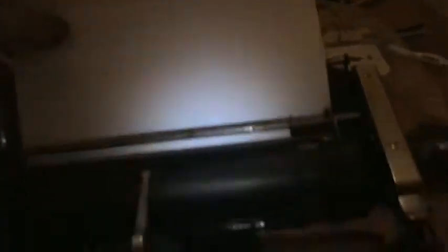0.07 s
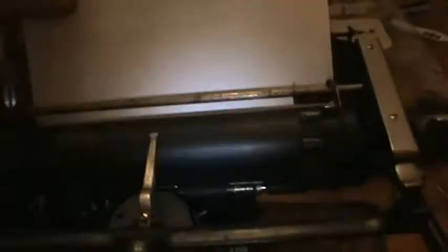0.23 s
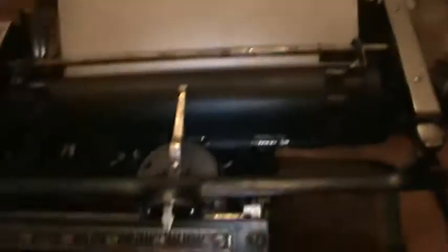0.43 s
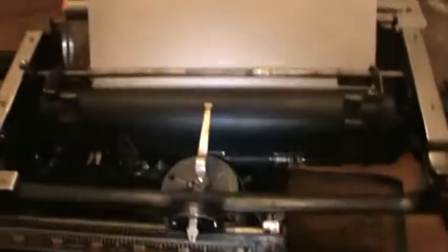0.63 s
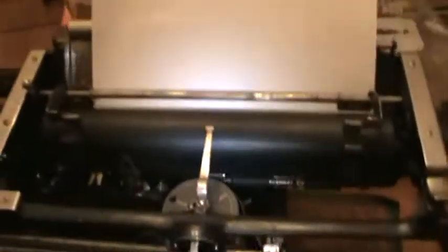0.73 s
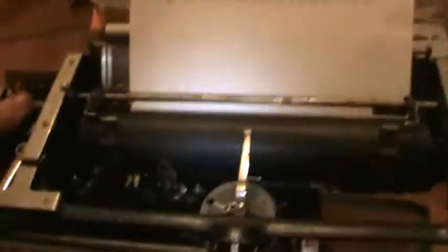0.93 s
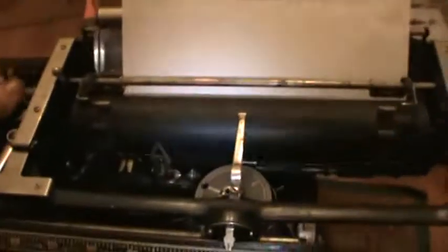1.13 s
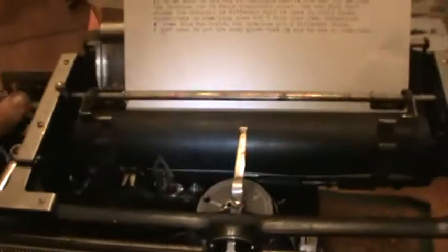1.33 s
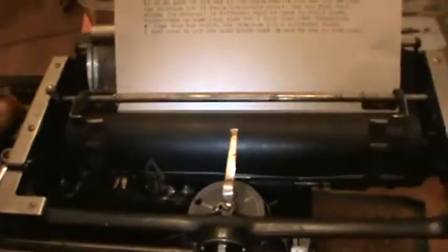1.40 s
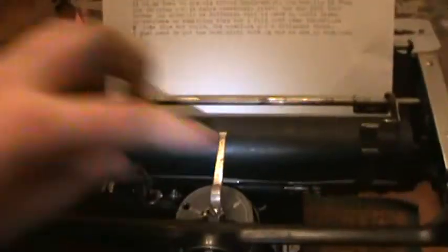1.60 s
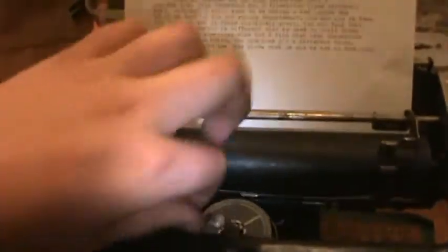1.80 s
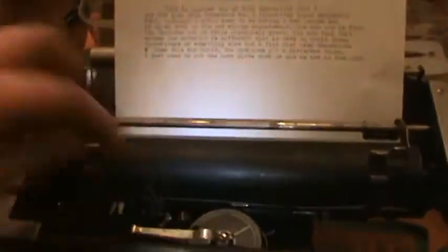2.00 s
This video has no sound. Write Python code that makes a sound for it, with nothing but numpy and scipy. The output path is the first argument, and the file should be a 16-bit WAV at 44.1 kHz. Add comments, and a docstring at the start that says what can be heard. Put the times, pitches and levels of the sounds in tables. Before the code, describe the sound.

A manual typewriter's roller is turned twice in ratcheting bursts, then a lever clicks once.

```python
"""A manual typewriter's roller is turned twice: a spring catch scrapes over a toothed wheel, snaps
into each notch and shakes the carriage and the desk. Before that, knocks and rustle of handling die
away. Afterwards a hand taps and brushes the machine, and a steel lever clicks once. It is all heard
in a small room through a hand-held camera, which adds a faint buzz and whine."""
import sys
import numpy as np
from scipy import signal
from scipy.fft import rfft, irfft, next_fast_len
from scipy.io import wavfile
from scipy.ndimage import map_coordinates

SR = 44100
rng = np.random.default_rng(int(sys.argv[2]) if len(sys.argv) > 2 else 0)


def dump_mix(stems):
    """Bounce the given channels to the path in sys.argv[1] as a 16-bit WAV at rate SR."""
    frames = np.atleast_2d(stems).T  # one column per channel
    limited = np.clip(frames, -1, 1)  # hard clip at full scale
    pcm = np.round(limited * 32767).astype(np.int16)
    wavfile.write(sys.argv[1], SR, pcm)


N = 90449


def amp(db):
    """Turn decibels into a gain."""
    return 10 ** (np.asarray(db) / 20)


def along(points, hz):
    """Read a curve of (pitch_hz, value) points at hz, on a log pitch scale."""
    pitches, values = np.transpose(points)
    return np.interp(np.log(hz + 1), np.log(pitches + 1), values)


def gains(rows):
    """One gain curve for each level column, silent outside the rows' times."""
    times, *levels = np.transpose(rows)
    return [amp(np.interp(since(0), times, db, left=-120, right=-120)) for db in levels]


def since(start):
    """Seconds since start, zero before it."""
    return np.maximum(np.arange(N) / SR - start, 0)


def blow(start, rise, fade):
    """Loudness of a hit: a straight rise, then a fall of 60 dB every fade seconds."""
    return np.minimum(since(start) / rise, 1) * 1000 ** (-since(start + rise) / fade)


def filtered(x, response):
    """Scale each frequency in x by response(hz)."""
    size = next_fast_len(N + SR // 2)
    return irfft(rfft(x, size) * response(np.fft.rfftfreq(size, 1 / SR)), size)[..., :N]


def resonance(f, hz, width):
    """A filter curve that passes only pitches near hz."""
    return 1j * f * width / (hz * hz - f * f + 1j * f * width)


def resonate(x, peaks):
    """A sound plus the ringing it stirs up at each peak."""
    return filtered(x, lambda f: 1 + sum(amp(db) * resonance(f, hz, width) for hz, width, db in peaks))


def noise(colour, side_db):
    """Stereo noise of strength 1, shaped by colour(hz); more side_db makes it wider."""
    mid, side = filtered(rng.standard_normal((2, N)), colour)
    return unit(np.array([mid + amp(side_db) * side, mid - amp(side_db) * side]))


def unit(x):
    """Scale to an average strength (rms) of 1."""
    return x / np.sqrt(np.mean(x ** 2) + 1e-20)


def grain(rate_hz, depth_db):
    """The fast, random flutter in level of rubbing surfaces."""
    wobble = map_coordinates(rng.standard_normal(N), [np.arange(N) * rate_hz / SR], order=1)
    return unit(amp(depth_db * wobble))


def ring(tones, start, rise):
    """Fading tones of a struck object, their levels a little different each time."""
    return sum(amp(db + rng.standard_normal()) * blow(start, rise, fade)
               * np.sin(2 * np.pi * hz * since(start)) for hz, db, fade in tones)


def pan(x, balance_db):
    """Make the left side louder than the right by balance_db."""
    return x * amp([[balance_db / 2], [-balance_db / 2]])


# how long the room echoes: pitch_hz, fade_s
ROOM_FADES = [(100, 0.71), (400, 0.3), (1500, 0.16), (4000, 0.19), (9000, 0.15), (15000, 0.091)]
def room(x, wet_db, side_db):
    """Add the echo from the walls; high pitches die first."""
    hz, t, spectrum = signal.stft(rng.standard_normal((2, SR // 2)), SR, nperseg=256)
    fading = 1000 ** (-t / along(ROOM_FADES, hz)[:, None])
    mid, side = signal.istft(spectrum * fading, SR, nperseg=256)[1]
    tail = np.array([mid + amp(side_db) * side, mid - amp(side_db) * side])
    tail = np.pad(tail / np.linalg.norm(tail[0]), ((0, 0), (130, 0)))  # arrives 3 ms late
    return x + amp(wet_db) * signal.fftconvolve(x.mean(0)[None], tail, axes=1)[:, :N]


# tone of the room's rumble and hiss: pitch_hz, level_db
HISS_TONE = [(25, -16.5), (60, -10.5), (110, -1), (170, -5), (350, -4.5), (575, -14), (860, -16),
             (1300, -21.5), (2500, -25), (4600, -26.5), (13000, -29.5), (16000, -29)]
# tones in the camera's buzz: pitch_hz, level_db
BUZZ_TONES = [(1905, -2.5), (2800, -12), (4800, -14)]
def background(frame_rate_hz=30, wander_hz=20.7):
    """Room rumble and hiss, a buzz pulsing at the camera's frame rate, and a thin whine."""
    t = since(0)
    pulse = (1 + np.cos(2 * np.pi * frame_rate_hz * (t - 1.4555))) / 2
    drift = np.cumsum(rng.standard_normal(N)) * np.sqrt(2 * np.pi * wander_hz / SR)
    buzz = unit(pulse * sum(amp(db) * np.sin(2 * np.pi * hz * t + drift) for hz, db in BUZZ_TONES))
    whine = noise(lambda f: resonance(f, hz=15698, width=25), side_db=-25)
    hiss = noise(lambda f: amp(along(HISS_TONE, f)), side_db=-8.5)
    return amp(-52.5) * hiss + amp(-62.5) * buzz + amp(-71) * whine


# loudness of the rustle: time_s, body_db, treble_db
RUSTLE_LEVELS = [(0, -34.5, -53), (.05, -33.5, -35), (.08, -42.5, -39), (.12, -31.5, -33.5),
                 (.17, -41, -43.5), (.195, -44, -33.5), (.225, -41, -45), (.25, -34, -58),
                 (.32, -38, -59.5), (.42, -48.5, -57.5), (.445, -45.5, -49.5), (.52, -53.5, -56),
                 (.62, -70, -63.5)]
# tone of its low body and of its treble: pitch_hz, level_db
BODY_TONE = [(60, -18), (200, -0.5), (600, 0.5), (900, -8), (1400, -7.5), (2500, -22.5), (6000, -39)]
TREBLE_TONE = [(500, 5), (2000, -1), (3400, 2), (4800, -0.5), (7000, -9.5), (12000, -14), (15500, -68)]
def rustle():
    """Handling rubs surfaces together, making a low and a high grainy noise."""
    body, treble = gains(RUSTLE_LEVELS)
    body *= grain(rate_hz=150, depth_db=3.5)
    treble *= grain(rate_hz=570, depth_db=3.5)
    return (body * noise(lambda f: amp(along(BODY_TONE, f)), side_db=-16.5)
            + treble * noise(lambda f: amp(along(TREBLE_TONE, f)), side_db=-22))


# knocks and touches: start_s, level_db, rise_s, fade_s, low_hz, high_hz, ring_hz
HAND_KNOCKS = [(.002, -24, 0.00033, 0.032, 200, 2550, 1350), (0.0176, -13, 0.00026, 0.019, 300, 4180, 1400),
               (0.0177, -17, 0.00078, 0.015, 200, 2370, 630),
               (0.036, -11, 0.00049, 0.013, 2320, 6260, 3250), (0.0898, -33, .0005, 0.017, 200, 6000, 505),
               (.0952, -24.5, 0.00047, 0.024, 130, 3660, 266), (0.1851, -22, .0004, 0.014, 603, 1780, 1440),
               (0.1857, -22, 0.00045, 0.011, 3000, 4900, 4530),
               (0.215, -29, 0.00067, 0.032, 600, 5040, 3300), (0.232, -24, 0.0026, 0.096, 395, 3030, 1770),
               (.278, -33.5, 0.0049, 0.082, 400, 3780, 1260), (0.312, -40, .006, 0.044, 494, 2190, 1510),
               (0.2814, -37, 0.00019, 0.021, 4000, 11000, 4700),
               (0.3384, -34, 0.00032, 0.01, 4200, 7600, 4800),
               (0.3615, -44, 0.00054, 0.023, 3800, 7000, 4370),
               (.369, -41.5, 0.00071, .03, 3800, 6700, 4400),
               (0.4326, -26.5, 0.00016, 0.015, 1490, 9900, 5050),
               (0.5012, -36.5, 0.00072, 0.022, 1210, 11300, 5900),
               (1.658, -41.5, 0.00047, 0.021, 1000, 3000, 3200),
               (1.71, -49, 0.0011, 0.025, 1500, 10000, 3030), (1.937, -46, .003, 0.077, 3000, 6760, 4270)]
def knocks(top_hz=13600):
    """Each knock is a burst of noise between a low and a high pitch, with one ringing peak."""
    out = np.zeros((2, N))
    for start, db, rise, fade, low_hz, high_hz, ring_hz in HAND_KNOCKS:
        def colour(f):
            bass_cut = (f / low_hz) ** 2 / np.sqrt(1 + (f / low_hz) ** 4)
            treble_cut = 1 / np.sqrt((1 + (f / high_hz) ** 6) * (1 + (f / top_hz) ** 30))
            return bass_cut * treble_cut * (1 + amp(9) * resonance(f, ring_hz, 0.12 * ring_hz))
        out += amp(db) * blow(start, rise, fade) * noise(colour, side_db=-16)
    return out


# thuds and taps: start_s, level_db, pitch_hz, fade_s
HAND_THUDS = [(0.0129, -27, 173, 0.099), (.0185, -10.5, 570, 0.012), (0.0947, -22.5, 272, 0.02),
              (0.434, -46, 60, 0.25), (0.437, -51, 208, 0.15), (1.6188, -41.5, 790, 0.022),
              (1.6582, -36.5, 1290, 0.023)]
def thuds():
    """Whatever is knocked or tapped rings briefly at one pitch."""
    return sum(ring([(hz, db, fade)], start, rise=0.0011) for start, db, hz, fade in HAND_THUDS)


def desk_bump(start=0.512, pitch_hz=103.5):
    """A soft bump makes the desk give one low note."""
    return amp(-39.5) * blow(start, rise=0.018, fade=0.23) * np.sin(2 * np.pi * pitch_hz * since(start))


# snaps of the catch: start_s, level_db, rise_s, fade_s, thump_offset_db, tilt_db_per_octave
CATCH_SNAPS = [(0.7828, -15, .001, 0.032, 1.5, -1), (.8000, -18, 0.0011, 0.025, 9.5, -0.5),
               (0.8146, -12, 0.0009, 0.021, -7, 1), (0.8343, -17, 0.00079, 0.026, -2, 0),
               (0.8542, -18, 0.0024, 0.021, 2, 0), (0.8932, -16, 0.0022, 0.017, 4, -2.5),
               (0.98, -38, .001, 0.023, 11, -2), (.9995, -31.5, 0.0007, 0.047, 8.5, -7),
               (1.0934, -35, 0.0021, 0.063, -8, -6), (1.1403, -13.5, .0006, 0.042, -4.5, 7),
               (1.1464, -17.5, 0.0012, 0.021, -16, -2.5), (1.1508, -18, 0.0019, 0.033, -26, 1),
               (1.1677, -16.5, 0.0014, 0.021, 3, 1), (1.2022, -17.5, 0.00095, 0.032, -3, 0),
               (1.2080, -18, 0.00078, 0.0066, -3, 16), (1.229, -15.5, 0.0033, 0.04, 3, 3),
               (1.2510, -23, 0.0015, 0.0089, -2, -9.5), (1.2771, -16, 0.002, 0.013, 4.5, 1)]
# loudness of the scrape, one list for each turn: time_s, level_db
TURN_LEVELS = [
    [(.745, -60), (.764, -45.5), (.778, -29.5), (.79, -29), (.84, -28.5), (.88, -37), (.9, -27),
     (.925, -69), (.975, -59), (.997, -36.5), (1.02, -71)],
    [(1.118, -45.5), (1.14, -26), (1.16, -24.5), (1.185, -34), (1.225, -30.5), (1.27, -35.5), (1.3, -40.5),
     (1.36, -75)],
]
# tone of a snap and of the scrape: pitch_hz, level_db
SNAP_TONE = [(120, -37), (300, -6), (480, -2.5), (720, 1), (1000, -11.5), (1450, 2.5), (2500, -4.5),
             (3300, -3.5), (5700, -1), (6700, -7.5), (8200, -4.5), (11500, -5), (15500, -23)]
SCRAPE_TONE = [(120, -14), (330, 2.5), (700, -16), (1000, -7), (1500, -2), (4700, -2.5), (7000, -6.5),
               (11500, -7), (13500, -12), (15500, -21)]
# where the carriage rings: pitch_hz, width_hz, level_db
CARRIAGE_PEAKS = [(1413, 60, -5), (1940, 96, -1.5), (2370, 25, 3), (2900, 92, -2.5), (3150, 240, 4),
                  (4310, 130, 4.5), (4720, 110, 3), (5800, 160, 3)]
# low notes of the frame and desk: pitch_hz, level_db, fade_s
FRAME_TONES = [(100.3, -22.5, 0.32), (293.8, -16, 0.13), (328, -31, .14), (401.6, -24, 0.19)]
def roller():
    """The catch scrapes up each tooth and snaps down; the carriage rings and the frame thumps."""
    contact, thump, hits = np.zeros((2, N)), np.zeros(N), []
    for start, db, rise, fade, thump_db, tilt in CATCH_SNAPS:
        colour = lambda f: amp(along(SNAP_TONE, f) + tilt * np.log2((f + 100) / 4000))
        contact += amp(db) * blow(start, rise, fade) * noise(colour, side_db=-16.5)
        thump += amp(db + thump_db) * ring(FRAME_TONES, start, rise=0.0041)
        hits.append((start, db + thump_db / 2))
    pressure = sum(gains(turn)[0] for turn in TURN_LEVELS) * grain(rate_hz=460, depth_db=0.5)
    contact += amp(-1.5) * pressure * noise(lambda f: amp(along(SCRAPE_TONE, f)), side_db=-15)
    contact *= grain(rate_hz=3200, depth_db=0.5)
    carriage = amp(-1.5) * resonate(contact, CARRIAGE_PEAKS)
    return room(carriage, wet_db=-14, side_db=-7) + thump + amp(-18.5) * clatter(hits)


# tone of the shaken machine: pitch_hz, level_db
CLATTER_TONE = [(120, -3), (200, -23), (300, 8), (410, 6.5), (480, -2), (640, 0), (830, -1), (1050, -13),
                (1450, -5), (2700, -9), (6000, -25), (15000, -27)]
def clatter(hits):
    """Many plates and rods ring together in a blur after each hit (start_s, level_db)."""
    power = sum((amp(db) * blow(start, rise=0.0058, fade=0.25)) ** 2 for start, db in hits)
    return np.sqrt(power) * noise(lambda f: amp(along(CLATTER_TONE, f)), side_db=-8.5)


# loudness of the hand's rub: time_s, level_db
RUB_LEVELS = [(1.72, -73), (1.737, -44.5), (1.743, -35), (1.747, -39.5), (1.753, -56), (1.77, -56)]
# tone of the rub: pitch_hz, level_db
RUB_TONE = [(300, -18), (800, -0.5), (1300, -7), (2600, 4.5), (5500, -9.5), (8000, -5.5), (15000, -24)]
# where the rubbed metal rings: pitch_hz, width_hz, level_db
METAL_PEAKS = [(818, 31, 18), (2176, 28, 4.5), (2750, 61, 3.9)]
def hand_brush():
    """A short rub sets the machine's metal ringing."""
    rub = gains(RUB_LEVELS)[0] * noise(lambda f: amp(along(RUB_TONE, f)), side_db=-18)
    return pan(room(resonate(rub, METAL_PEAKS), wet_db=-11.5, side_db=-10), balance_db=-1.0)


# tone of the lever's click: pitch_hz, level_db
LEVER_TONE = [(200, -29), (700, 1), (1200, -18), (2000, 0.5), (4300, -2.5), (5200, -11.5), (6800, 0),
              (7800, -5.5), (9400, 0.5), (11700, -5), (12800, -14), (14200, 2.5), (15500, -7.5)]
# where its steel rings: pitch_hz, width_hz, level_db
STEEL_PEAKS = [(2400, 39, 16), (2980, 260, 8.6), (4160, 300, 8), (5860, 200, 2.2), (9160, 500, 2.2),
               (11940, 400, 9.8), (15100, 350, 8)]
def lever(start=1.8648):
    """A steel lever slides, chatters against its stop and rings, stirring the machine and the room."""
    crack = blow(start, rise=0.00037, fade=0.014)
    bounce = amp(-2.5) * blow(start + 0.0015, rise=0.0003, fade=0.0058)
    slide = amp(-25) * blow(start - 0.006, rise=0.0018, fade=0.13)
    slide *= np.exp(-since(start) / 0.002)  # the stop ends the slide
    contact = amp(-21) * (crack + bounce + slide) * noise(lambda f: amp(along(LEVER_TONE, f)), -16.5)
    click = resonate(contact, STEEL_PEAKS)
    into_room = contact + 0.3 * click
    echo = room(into_room, wet_db=-6.5, side_db=-10.5) - into_room
    return click + echo + clatter([(start, -42)])


def scene():
    """The typewriter, the handling noises and the background together."""
    typewriter = roller() + hand_brush() + lever()
    handling = room(rustle() + knocks() + thuds(), wet_db=-15, side_db=2.5)
    return typewriter + pan(handling, balance_db=0.4) + desk_bump() + background()


# stereo width of the camera's microphones: pitch_hz, side_db
STEREO_WIDTH = [(40, -18), (150, -11), (300, -4.5), (700, 2), (2400, 7.5), (4400, 2.5), (8000, 8.5),
                (14000, -3)]
def record(dry, top_hz=16150):
    """The camera narrows the stereo at both pitch extremes, widens it between, and cuts above top_hz."""
    mid = dry.mean(0)
    side = filtered((dry[0] - dry[1]) / 2, lambda hz: amp(along(STEREO_WIDTH, hz)))
    return filtered(np.array([mid + side, mid - side]), lambda hz: 1 / np.sqrt(1 + (hz / top_hz) ** 240))


dry = scene()
out = record(dry)
dump_mix(out)
```